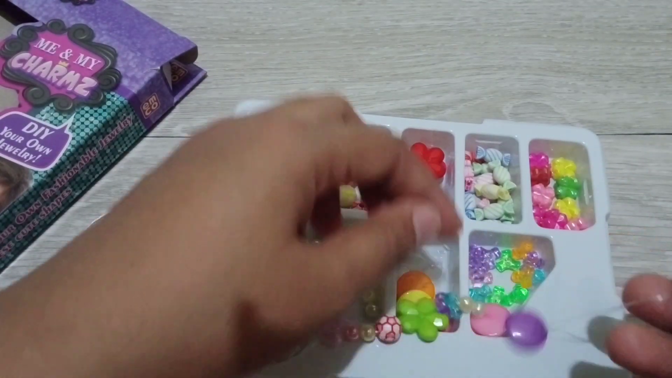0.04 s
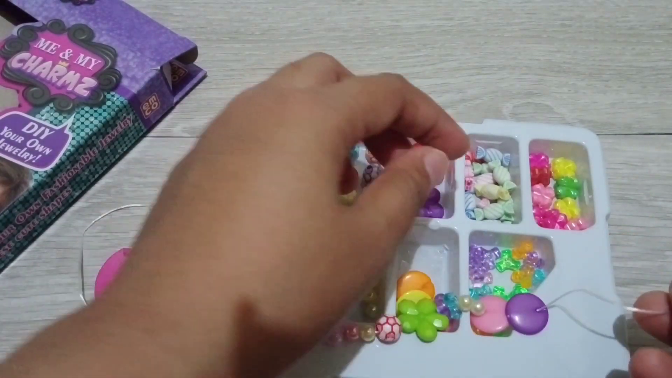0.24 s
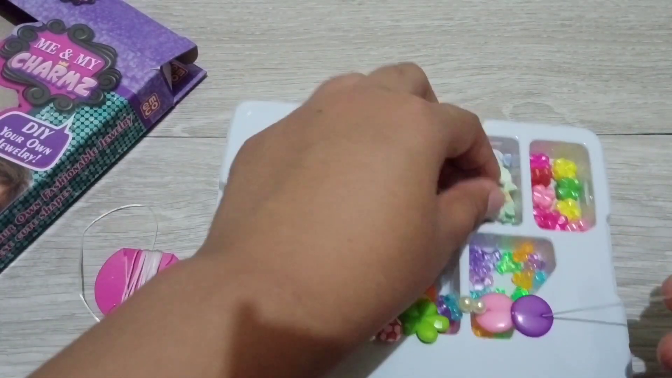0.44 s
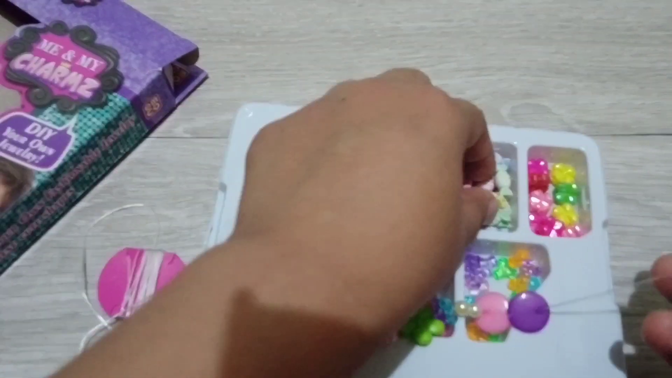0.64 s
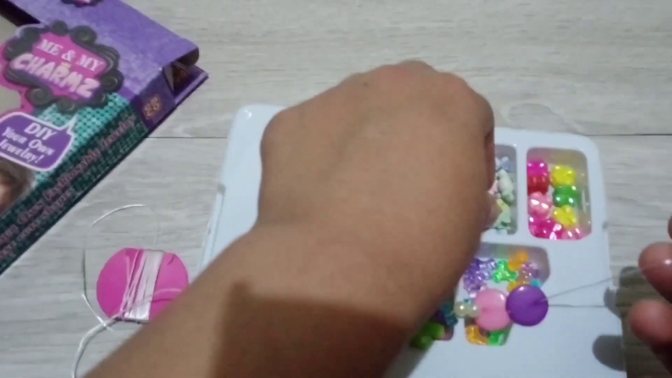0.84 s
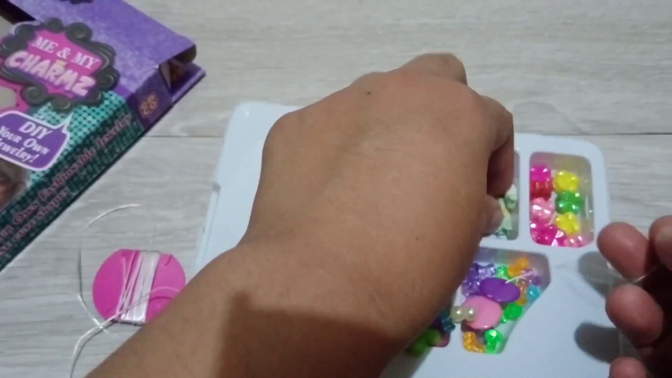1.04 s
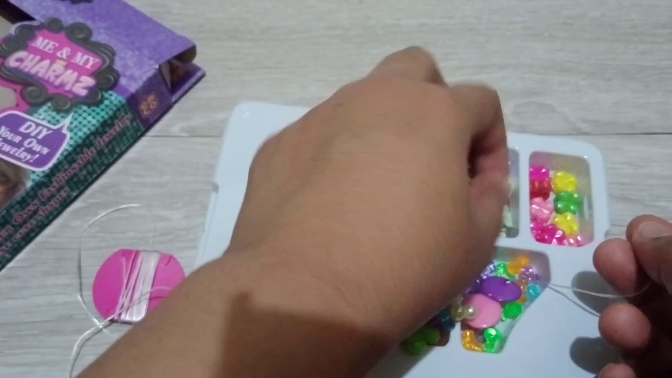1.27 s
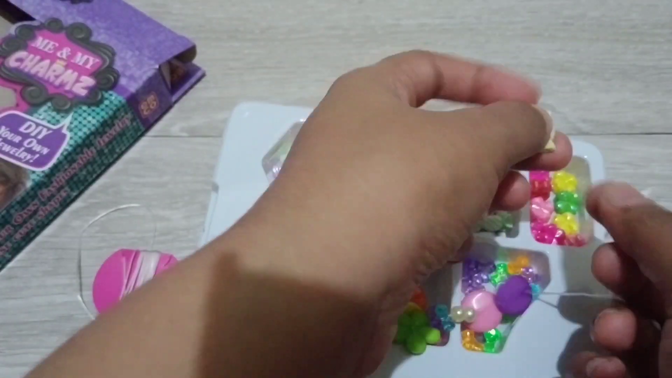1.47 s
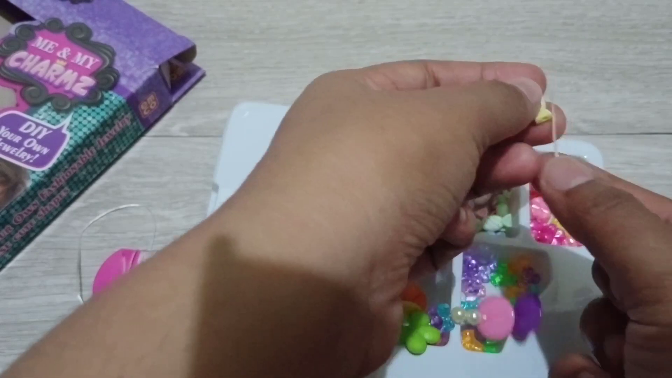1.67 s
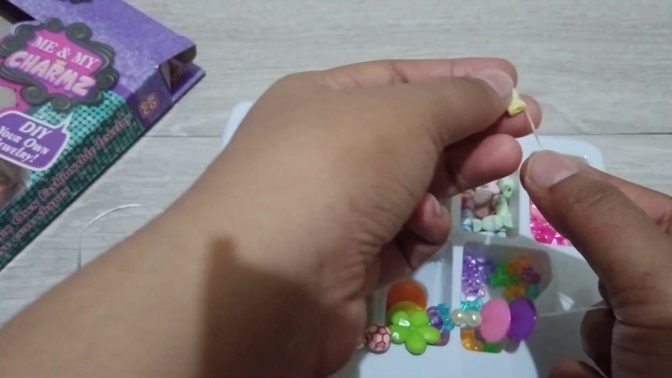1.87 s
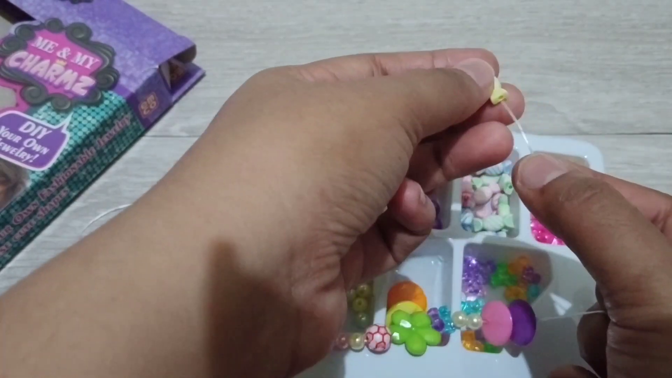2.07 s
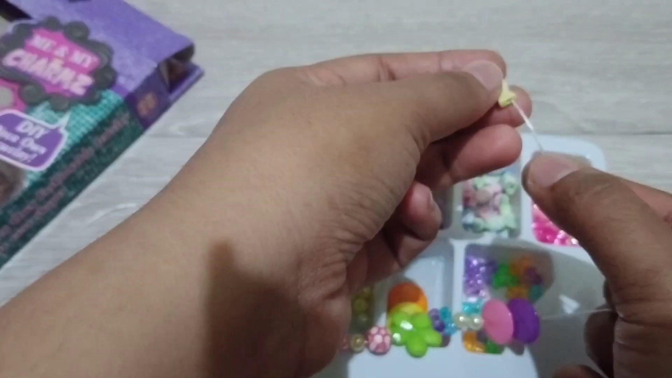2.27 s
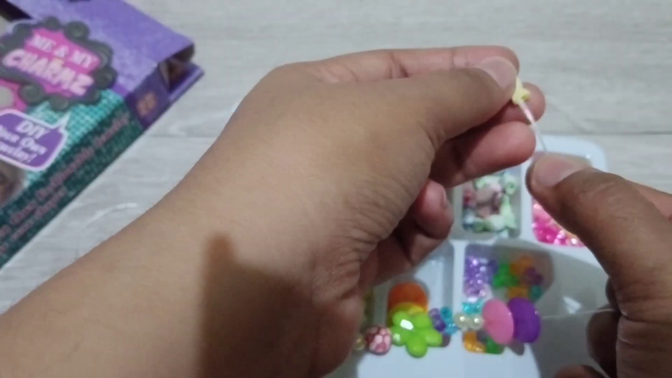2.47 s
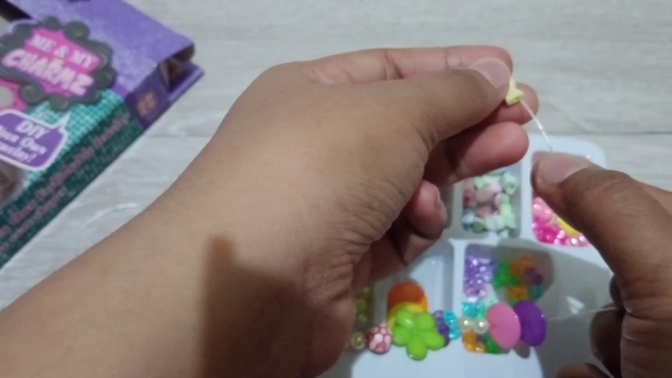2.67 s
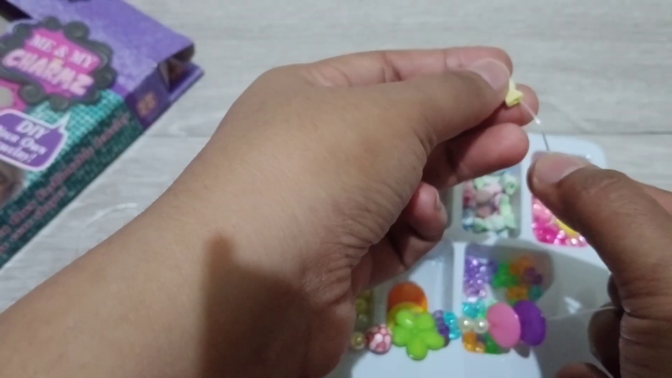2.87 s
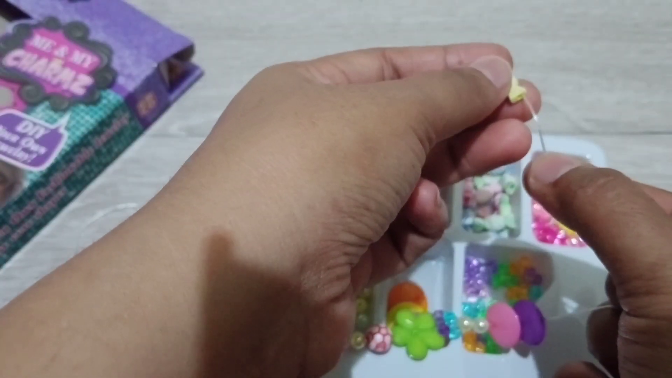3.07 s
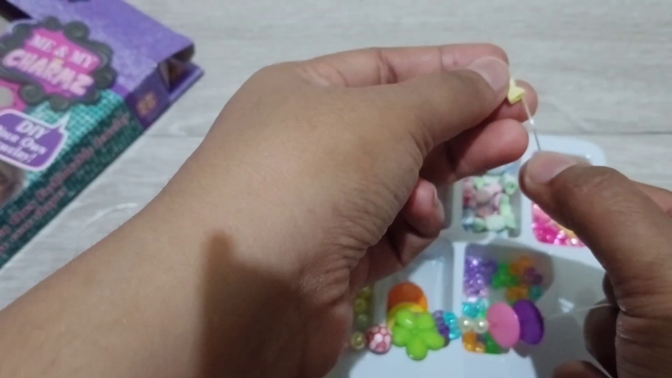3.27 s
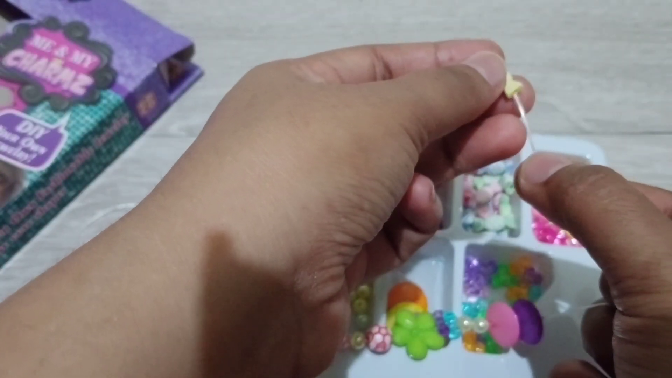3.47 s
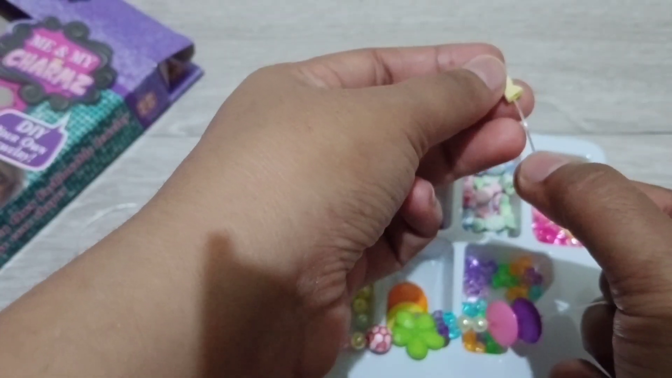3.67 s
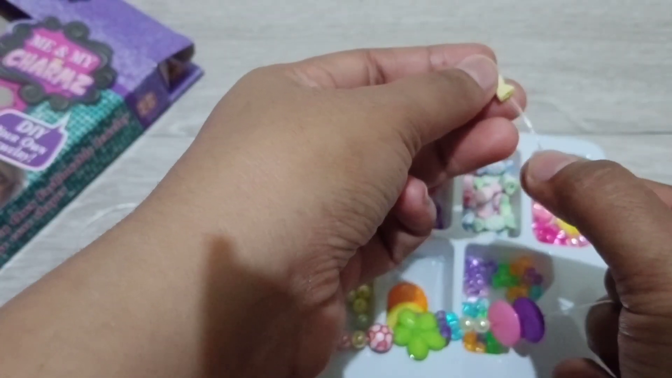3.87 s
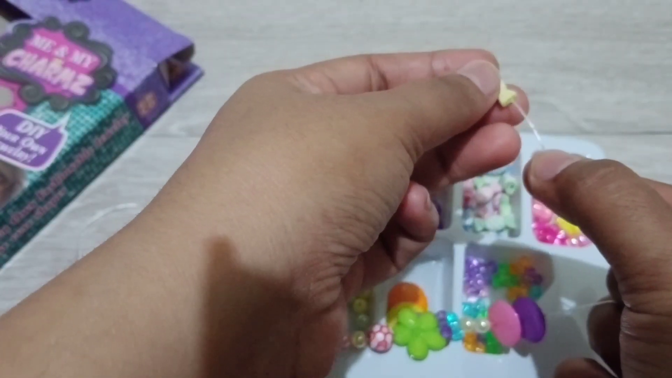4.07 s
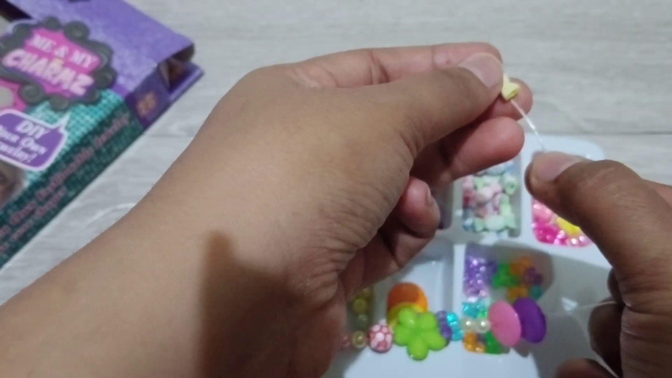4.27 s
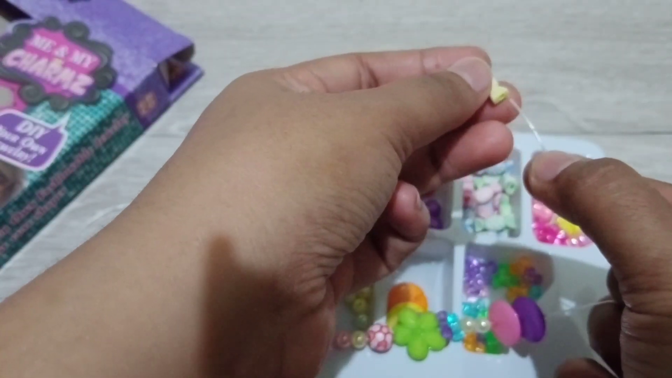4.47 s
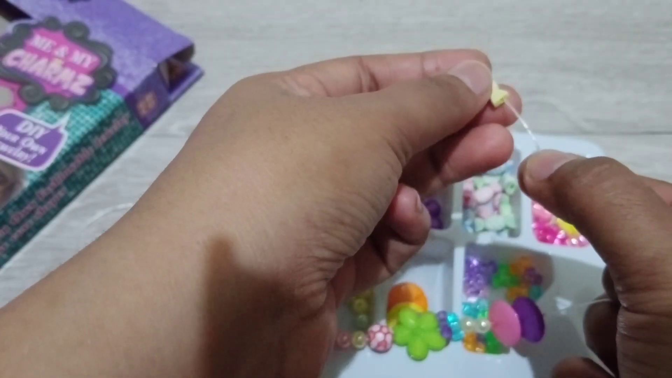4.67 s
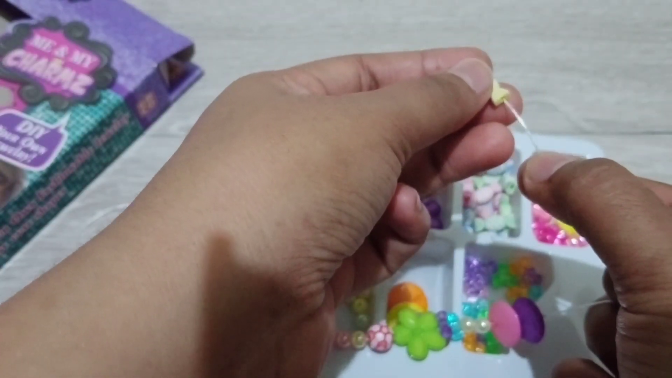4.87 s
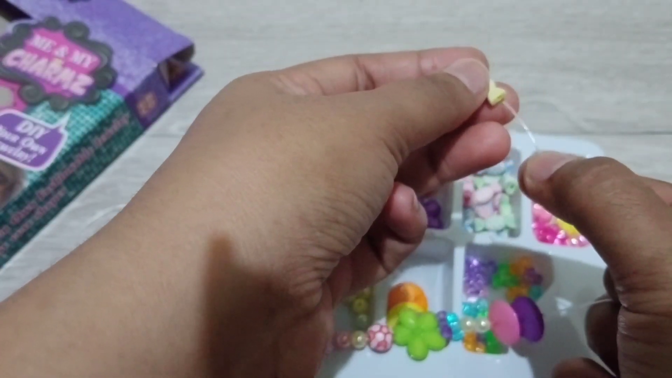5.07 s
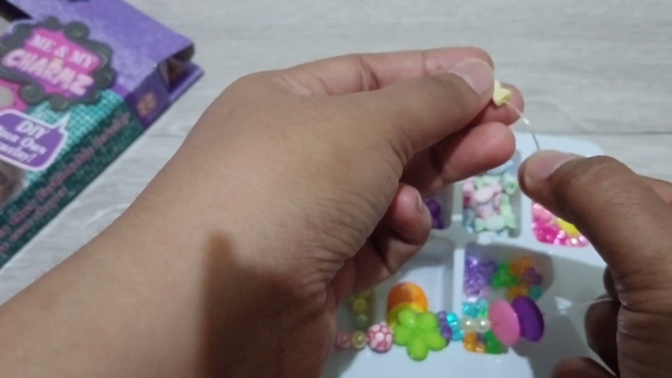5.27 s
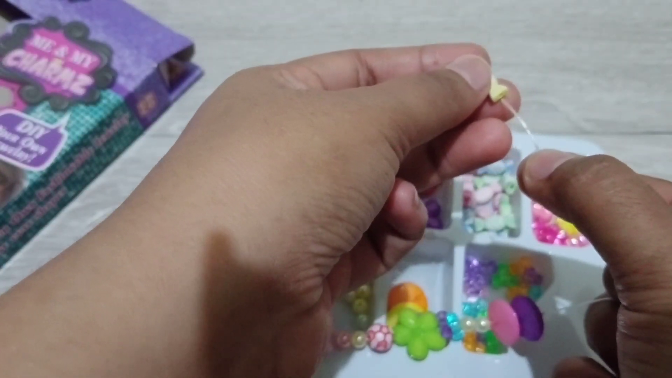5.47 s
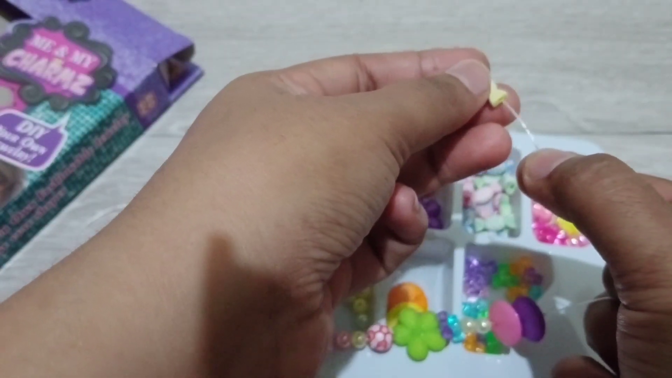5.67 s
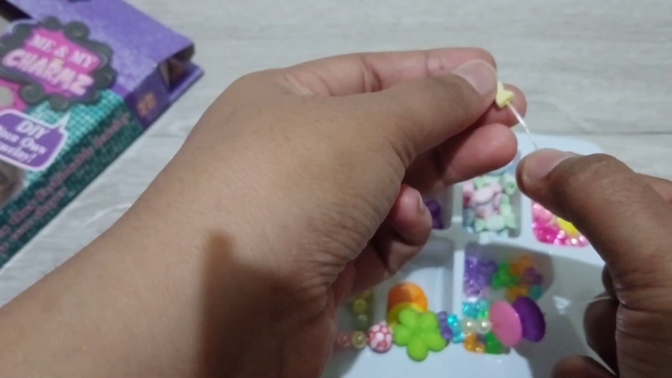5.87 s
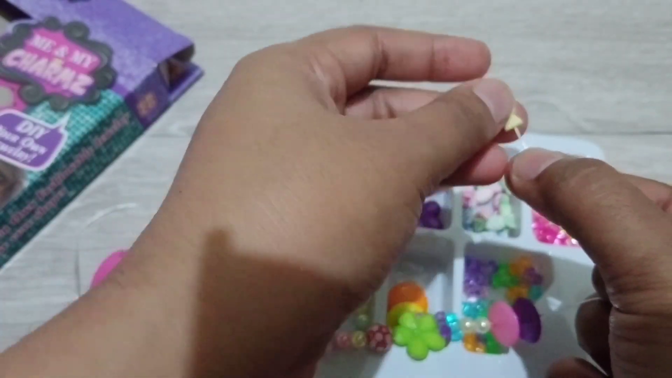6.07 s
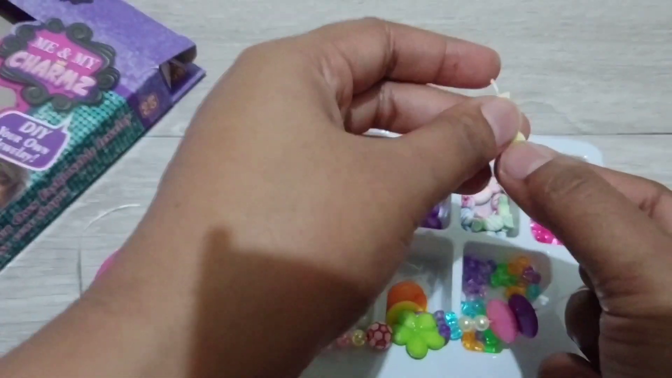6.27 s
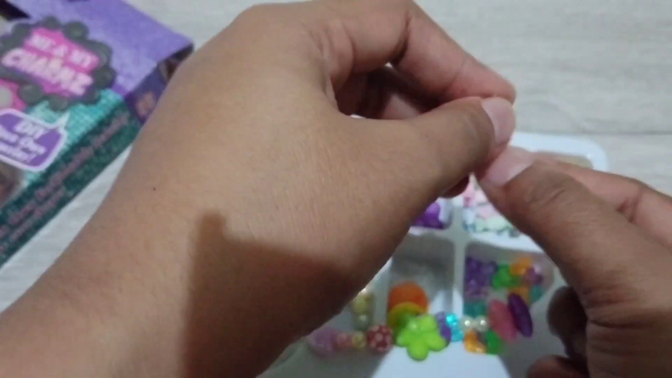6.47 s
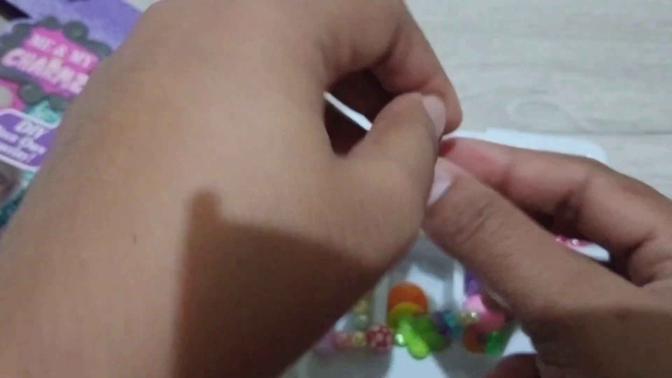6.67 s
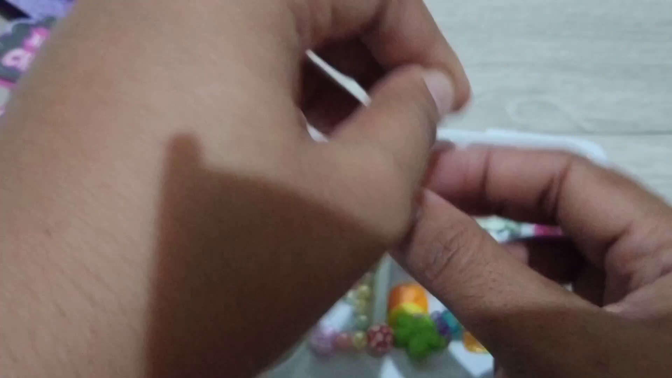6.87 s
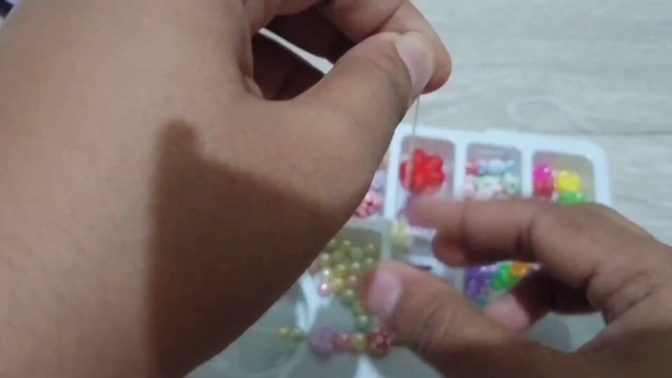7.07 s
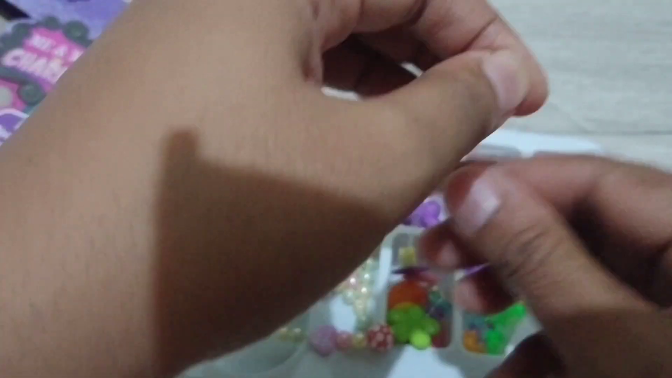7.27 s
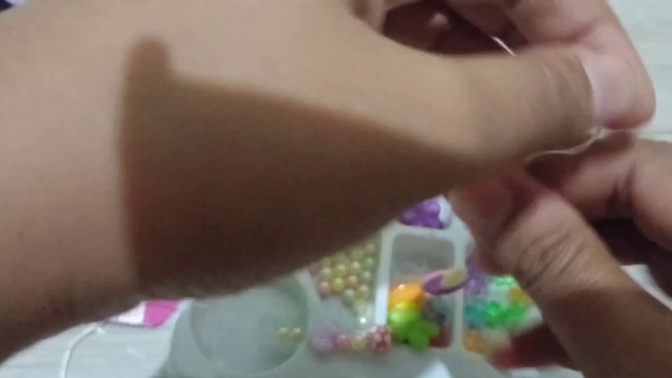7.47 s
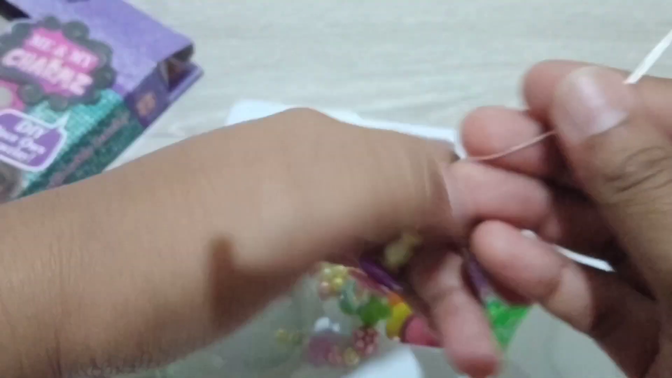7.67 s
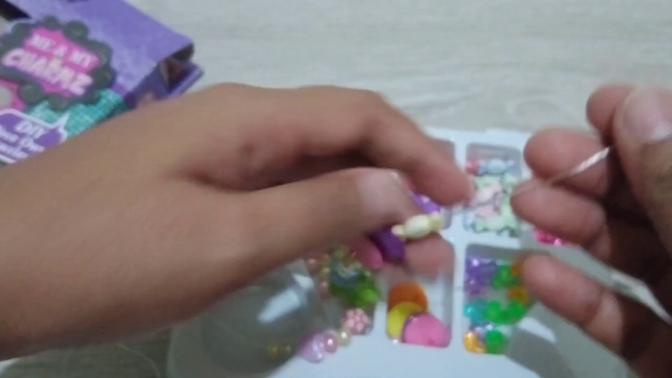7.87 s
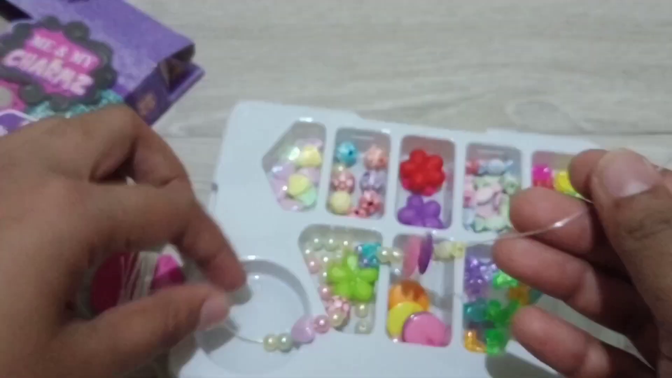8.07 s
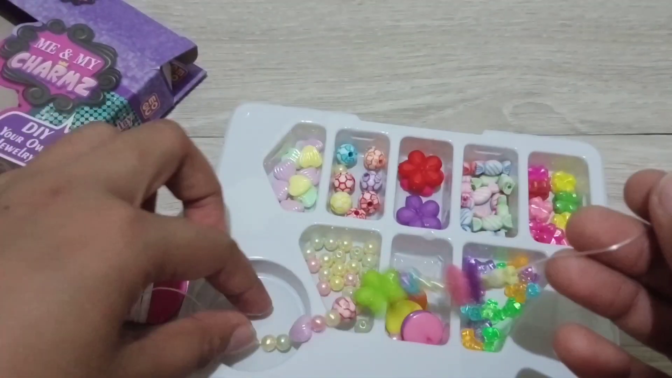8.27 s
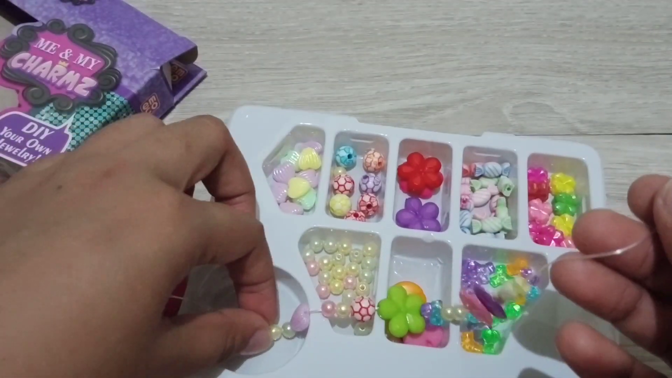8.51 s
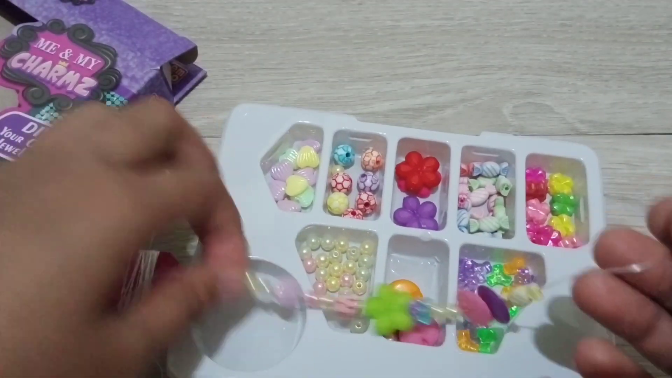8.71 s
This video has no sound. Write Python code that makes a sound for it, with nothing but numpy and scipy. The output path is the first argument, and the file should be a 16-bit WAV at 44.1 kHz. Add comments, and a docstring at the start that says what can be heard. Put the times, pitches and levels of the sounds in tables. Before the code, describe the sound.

A fan hums throughout in a small room while someone picks through plastic beads near a phone microphone. The beads rattle and tap in a thin tray, which rings briefly, and one sharp click stands out. For about four seconds there is little but the fan and a very faint pulsing hiss. Then the clicking and jostling return, mixed with small squeaks of fingers and cord.

```python
"""Plastic beads picked and threaded over a thin moulded tray, close to a phone microphone in a small room.
A fan hums behind throughout. For the first 1.6 s beads click and slide, ringing the tray, and the room
answers; one loud click follows near 2 s. A lull holds little but the fan, a faint pulsing whisper and
the odd soft rustle or rub. The fingers stir near 5.9 s, and from 6.6 s to the end the beads click
and rustle busily again, with small squeaks of skin and cord on plastic."""
import sys
import numpy as np
from scipy import signal
from scipy.fft import rfft, irfft, next_fast_len
from scipy.io import wavfile
from scipy.ndimage import map_coordinates

SR = 44100
rng = np.random.default_rng(int(sys.argv[2]) if len(sys.argv) > 2 else 0)


def transcribe(signal):
    """Save signal, clipped to [-1, 1], as a 16-bit WAV file at the path in sys.argv[1]."""
    frames = np.atleast_2d(signal).T
    limited = np.clip(frames, -1, 1)
    pcm = np.round(limited * 32767).astype(np.int16)
    wavfile.write(sys.argv[1], SR, pcm)


N = 385434

# spectrum of the fan's air noise at the microphone: f/Hz, relative level/dB
FAN_AIR = [(15, -13), (40, -2), (75, -6), (120, -1.5), (210, -5.5), (400, -9.5), (750, -10.5), (900, -15.5),
           (3350, -21), (3750, -23), (4300, -29), (5570, -34.5), (6800, -20.5), (8800, -32), (9850, -36.5),
           (13500, -38.5), (15300, -40), (15800, -47), (15950, -91)]
# decay of the small room: f/Hz, t60/s
ROOM_DECAY = [(400, 0.16), (1500, 0.33), (5000, 0.27), (12000, 0.24)]
# modes of the tray and its beads: f/Hz, width/Hz, relative level/dB
TRAY_MODES = [(232, 47, -29), (302, 54, 8), (376, 110, 8.5), (683, 390, 3.5), (772, 360, 3), (1050, 50, -5),
              (1235, 76, -16), (1334, 86, 8.5), (1436, 130, 3), (1513, 98, 9), (1582, 700, 0.5),
              (1903, 65, 9), (2277, 680, 0.5), (2403, 78, 12.5), (2540, 520, 4), (2826, 160, 14.5),
              (3210, 600, 4.5), (3630, 136, 14.5), (3930, 810, -1.5), (4640, 140, 8), (5940, 1400, -8.5),
              (7000, 130, 14.5), (7970, 930, 8.5), (9220, 200, -2), (10100, 26, 1), (15700, 820, 1)]
# the registers of a contact (knock, clack, tick, sizzle): low f/Hz, high f/Hz, multiple of its t60
REGISTER_BANDS = [(561, 1710, 1.24), (2020, 4600, 1.26), (4560, 9860, 1.05), (9400, 22000, 2.6)]
# skin and cord slipping on plastic: t/s, length/s, first f/Hz, last f/Hz, width/Hz, level/dB
SLIPS = [(0.433, 0.014, 1640, 2060, 300, -55), (3.8, 0.055, 1554, 1550, 500, -70),
         (5.9, 0.053, 1810, 1780, 398, -59), (5.965, 0.038, 8100, 8100, 700, -65.5),
         (6.764, 0.06, 2810, 3760, 1530, -50), (7.008, 0.01, 9600, 9570, 1590, -42),
         (7.939, 0.071, 1370, 1390, 200, -54)]
# beads sliding and jostling: t/s, length/s, level/dB, hollowness/dB, hardness/dB, fade/dB
# hollowness is the low knock over the clack, hardness the tick over the clack
SLIDES = [(0.041, 0.094, -58.5, 2.5, -1.5, 30), (0.445, 0.064, -52.5, 1, -5, 7),
          (.5, 0.091, -69, 5, -7, 14), (0.581, 0.038, -60, 3, -5, 7), (.67, 0.048, -65, -9, -10, 10),
          (0.751, 0.028, -55, 0, -8, 0), (.771, 0.13, -55.5, 1, -7, 23), (0.86, 0.14, -62.5, 2.5, -8, 1),
          (0.96, 0.095, -51, 0.5, -8, -10), (1.04, 0.082, -58, 2, -2.5, -7),
          (1.124, 0.18, -57.5, 3.5, -7, -3), (1.464, 0.096, -67.5, 0, -2, 6), (1.571, .035, -67, 5, 0, 10),
          (1.855, 0.032, -69, 2, -19, 0), (2.528, .025, -70.5, 4, -9, 2), (4.05, .05, -73, 2, -2, 0),
          (5.897, 0.081, -71.5, 7, -5, 24), (5.957, .072, -74.5, 5, 6, 7), (6.651, 0.085, -53, -6, -3, 24),
          (6.752, 0.13, -50.5, -8, -12.5, 19), (6.848, 0.12, -59.5, -3, -5, 20),
          (6.937, .045, -58, -1, -7, 17), (6.968, 0.11, -58.5, 1, -8, -3),
          (7.137, 0.083, -61.5, -3, 0.5, -3), (7.195, 0.15, -71.5, 2.5, 0.5, 6),
          (7.474, 0.17, -70, 3.5, -0.5, 11), (7.617, 0.12, -66, -2, 4.5, 11),
          (7.723, 0.14, -70, 2, -3.5, 5), (7.86, 0.12, -69.5, -1, -1, 7), (7.94, 0.041, -48.5, -2, -9, 9),
          (8.002, 0.037, -50.5, -1, 3.5, 18), (8.055, 0.049, -68.5, 1, -6, 7),
          (8.099, 0.13, -64.5, 2.5, -5, -8), (8.203, 0.089, -70.5, 6.5, 0, 3),
          (8.262, 0.096, -63, 5.5, -6, -1), (8.296, 0.016, -51.5, 7, 0, -3),
          (8.316, 0.056, -57.5, 1.5, -2, 10), (8.495, 0.054, -66, 0, -8, 7), (8.571, .06, -65.5, 7, -8, -9),
          (8.627, 0.044, -54, -9, -5, 20), (8.718, 0.0088, -45, 6.5, -1, -10)]
# single contacts: t/s, level/dB, hollowness/dB, hardness/dB, knock f/Hz, clack f/Hz, t60/s
# the two pitches tell which modes the struck spot favours
CONTACTS = [(.0179, -56.5, 8, -3, 660, 2220, 0.055), (.0433, -30.5, -7, -12.5, 1170, 3520, 0.023),
            (0.073, -39, -2, -9.5, 1460, 2510, 0.017), (0.4649, -37.5, -2.5, -19.5, 1300, 2240, 0.02),
            (.481, -46, -2, -11, 1190, 3110, 0.025), (0.591, -59, -7, -9, 1640, 1910, 0.081),
            (0.6179, -39, 0, -14.5, 1500, 3150, 0.031), (0.6247, -35.5, -0.5, -7, 1590, 2410, 0.027),
            (0.667, -62, 16, -1, 1714, 1930, 0.024), (0.6935, -48, -4, -19, 1380, 3330, 0.028),
            (0.7666, -27.5, -8, 1.5, 1420, 3700, 0.027), (0.7843, -30, -4.5, -0.5, 870, 2360, 0.02),
            (.815, -39, 2.5, -2.5, 790, 3340, 0.014), (0.886, -43, 1, 1.5, 810, 2400, 0.015),
            (0.9266, -40.5, -14, -10.5, 1590, 2430, .019), (0.945, -47, -16, -6, 1530, 2210, 0.036),
            (0.976, -48.5, -5, -2.5, 780, 2290, 0.066), (0.995, -41.5, -3, 0, 1030, 2190, 0.061),
            (1.0143, -29, -11, -10, 810, 2620, 0.018), (1.0199, -41, -3, -3.5, 1600, 3140, 0.053),
            (1.0644, -47.5, -3, -16, 1410, 3150, .039), (1.092, -43.5, -2.5, -13.5, 830, 3180, .02),
            (1.173, -42, -5.5, -17, 1630, 3400, 0.019), (1.2177, -53.5, 3, -13, 898, 2420, 0.045),
            (1.232, -43.5, -3, -11, 980, 2550, 0.028), (1.26, -45.5, -6, -12, 1570, 2530, 0.057),
            (1.298, -41, -6.5, -2, 1090, 2440, 0.03), (1.412, -45.5, 4, -5, 1660, 1850, 0.017),
            (1.476, -48.5, -2, -21.5, 1480, 2550, 0.014), (1.4923, -52.5, -1, -12, 1560, 2230, 0.049),
            (1.4984, -47.5, 6.5, -6, 1550, 2400, 0.0098), (1.533, -39, -2, -2.5, 1630, 2420, 0.022),
            (1.5666, -48.5, -2.5, -19, 1580, 2290, 0.051), (1.9513, -23.5, -1.5, -2, 820, 2020, 0.016),
            (6.026, -51.5, -2.5, -10.5, 1670, 2610, 0.035), (6.591, -48, 1, -10.5, 1520, 2640, 0.02),
            (6.6372, -47, -3, -4.5, 1450, 3400, 0.036), (6.656, -35, -1, -10.5, 1390, 2510, 0.02),
            (6.6668, -37, 3.5, 3, 1540, 2170, .058), (6.6713, -26.5, -11, -4, 1500, 2450, 0.032),
            (6.7269, -38, -8, -10, 1350, 2040, 0.017), (6.813, -49, -0.5, -2, 1400, 3550, 0.083),
            (6.823, -45.5, 1, -1.5, 810, 3230, 0.042), (6.8642, -45, 2, -6.5, 1510, 3570, 0.042),
            (6.8916, -36, -3.5, -11.5, 1470, 1980, 0.023), (6.9416, -33.5, -2, -6, 1500, 2050, 0.0099),
            (6.9825, -47.5, -3, 9.5, 1320, 2310, 0.023), (6.99, -38, 2.5, 0, 800, 3900, 0.022),
            (7.0071, -41.5, -5, -14.5, 1450, 4040, 0.047), (7.012, -57, -5, 7, 1490, 2060, 0.018),
            (7.1546, -56, 5, -2.5, 1340, 1850, 0.023), (7.1985, -48, 0.5, 7.5, 1560, 2340, 0.011),
            (7.2144, -49.5, 0.5, -12, 1500, 2050, 0.028), (7.3089, -56, 2.5, -11, 710, 2190, 0.026),
            (7.3829, -40, -3, -8, 887, 1990, .025), (7.532, -59, 12, 4, 1370, 2110, 0.019),
            (7.6714, -55, 3, 3.5, 1430, 2970, .037), (7.683, -58, 3, 5.5, 810, 2190, 0.024),
            (7.833, -53, -2, -1, 1210, 2550, 0.048), (7.895, -72, -6, 14, 1220, 2610, 0.029),
            (7.934, -37, -2, -4, 1340, 2120, 0.055), (7.942, -48, 9, 8.5, 1290, 1900, 0.044),
            (7.954, -49, -2, -2.5, 1460, 2090, 0.22), (7.978, -39.5, -3, -12, 1310, 1850, 0.012),
            (7.992, -39, 0, -6, 1530, 2400, 0.045), (8.005, -30, -5, -5.5, 1390, 2390, 0.037),
            (8.055, -52, -3, -9, 1700, 2440, 0.047), (8.125, -44.5, 1, -12, 1470, 1860, 0.03),
            (8.153, -54, -6, -4, 1540, 2450, 0.099), (8.237, -54, -7, -14, 1030, 2260, .036),
            (8.2772, -58, 16, -14, 1480, 1990, .008), (8.309, -27, -1.5, -4.5, 1360, 2220, 0.027),
            (8.3479, -41, 4, -7.5, 1370, 2190, 0.029), (8.358, -41.5, -5, -10.5, 1690, 2110, 0.03),
            (8.4983, -52.5, 1, -10.5, 1240, 2360, 0.027), (8.581, -51, -3, -3, 1670, 2380, .025),
            (8.6194, -54.5, 0, -9, 1400, 2480, 0.11), (8.6358, -30, -8.5, -3.5, 733, 2460, 0.01),
            (8.7242, -34, -10, -9.5, 1410, 2440, 0.04)]
# the whole tray thumps more while fingers press into it: t/s, thump level over the knock/dB
FINGER_PRESS = [(0, -11), (.45, -14.5), (1.25, 0), (1.35, -35), (7.1, -33), (7.3, -7), (7.5, -8),
                (7.93, -3), (7.97, -30), (8.2, -15.5), (8.64, -9), (8.72, -26)]
# colour of the phone microphone: f/Hz, gain/dB
MIC_COLOUR = [(20, -13.5), (90, 1.5), (13500, -1.5), (15300, 4.5), (15800, 10), (16500, -25)]

AIR_DB, BLADE_DB, OCTAVE_DB, WHINE_DB = -62.5, -70.5, -63.5, -90
BLADE_HZ, WHINE_HZ = 245.6, 3760
WHISPER_FIRST_S, WHISPER_EVERY_S, WHISPER_S = 0.575, 0.59, 0.064
WHISPER_HZ, WHISPER_WIDTH_HZ, WHISPER_DB = 3740, 300, -80
MIDDLE_DB, RISE_S = -40, 0.0006  # level and rise of a middling contact
ROOM_DB, MIC_TOP_HZ = -15.5, 16800


def amp(db):
    """Gain of a level in dB."""
    return 10 ** (np.asarray(db) / 20)


def unit(x):
    """x at rms 1."""
    return x / np.sqrt(np.mean(x ** 2) + 1e-20)


def decay(t, t60):
    """An envelope that falls 60 dB in t60 seconds."""
    return amp(-60 * t / t60)


def along(points, hz):
    """(f/Hz, value) points interpolated on a log axis."""
    f, v = np.transpose(points)
    return np.interp(np.log(hz + 1), np.log(f + 1), v)


def wobble(rate):
    """A smooth random curve, rate knots a second."""
    return map_coordinates(rng.standard_normal(int(N * rate / SR) + 4), [np.arange(N) * rate / SR])


def filtered(x, response):
    """x times a complex response of frequency."""
    m = next_fast_len(N + SR // 2)
    return irfft(rfft(x, m) * response(np.fft.rfftfreq(m, 1 / SR)), m)[..., :N]


def whisper():
    """Faint in the background, a high narrow noise swells softly at an even pace."""
    t = np.arange(N) / SR
    from_peak = (t - WHISPER_FIRST_S + WHISPER_EVERY_S / 2) % WHISPER_EVERY_S - WHISPER_EVERY_S / 2
    swell = np.exp(-(2 * from_peak / WHISPER_S) ** 2) * amp(WHISPER_DB + 1.2 * wobble(1.8))
    band = lambda hz: np.exp(-((hz - WHISPER_HZ) / WHISPER_WIDTH_HZ) ** 2)
    return swell * unit(filtered(rng.standard_normal(N), band))


def fan():
    """The fan behind the tray: air noise, a wavering blade tone, its steadier octave and a thin whine."""
    air_gain = amp(AIR_DB + 0.49 * wobble(2.74))
    air = air_gain * unit(filtered(rng.standard_normal(N), lambda hz: amp(along(FAN_AIR, hz))))
    phase = 2 * np.pi * np.cumsum(BLADE_HZ + 0.42 * wobble(6.8)) / SR
    blade = wobble(16) * np.sin(phase) + wobble(16) * np.cos(phase)  # comes and goes at random
    whine_gain = amp(WHINE_DB + 3.3 * wobble(4))
    whine = whine_gain * np.sin(2 * np.pi * WHINE_HZ * np.arange(N) / SR + wobble(12))
    blade_gain = amp(BLADE_DB + 2 * wobble(6))
    octave = amp(OCTAVE_DB + 1.13 * wobble(6)) * np.sin(2 * phase)
    return air + blade_gain * blade + whine + octave


def room(x):
    """The small room's diffuse answer, new as the hands move; each frequency dies at its own speed."""
    out, step = np.zeros(N + 2 * SR), SR // 4
    wall_delay = round(0.008 * SR)
    for at in range(0, N, step):
        hz, t, noise = signal.stft(rng.standard_normal(SR // 3), SR, nperseg=256)
        near = 1 + 0.37 * decay(t, 0.12)  # the floor and the hands answer first and briefly
        tail = signal.istft(noise * near * decay(t, along(ROOM_DECAY, hz)[:, None]), SR, nperseg=256)[1]
        answer = signal.fftconvolve(x[at:at + step], tail / np.linalg.norm(tail))
        out[at + wall_delay:][:len(answer)] += answer
    return out[:N]


def squeaks():
    """Skin and cord stick and slip on plastic: gliding tones that jitter in strength and phase."""
    out = np.zeros(N)
    for start, length, first_hz, last_hz, width_hz, db in SLIPS:
        u = np.linspace(0, 1, round(length * SR))
        knots = rng.standard_normal((2, 100))
        jitter = [map_coordinates(row, [u * length * width_hz]) for row in knots]
        phase = 2 * np.pi * np.cumsum(first_hz + (last_hz - first_hz) * u) / SR
        rub = jitter[0] * np.sin(phase) + jitter[1] * np.cos(phase)
        out[round(start * SR):][:len(u)] += amp(db) * np.sin(np.pi * u) ** 0.68 * rub
    return out


def tray_response(f):
    """The thin tray's resonances split into the four registers, each with unit power gain."""
    modes = sum((-1) ** k * amp(db) * 1j * f * width / (hz * hz - f * f + 1j * f * width)
                for k, (hz, width, db) in enumerate(TRAY_MODES))
    bands = [signal.butter(3, [lo, hi], "band", fs=SR, output="sos") for lo, hi, _ in REGISTER_BANDS]
    response = np.array([signal.sosfreqz(band, f, fs=SR)[1] for band in bands]) * (modes + amp(-1))
    return response / np.sqrt(np.mean(np.abs(response) ** 2, axis=1, keepdims=True))


def tray_ring(t, centre_hz, spread):
    """The tray's modes near one pitch, struck together at random strengths; rms near 1."""
    hz, _, db = np.transpose(TRAY_MODES)
    strength = amp(db + 5 * rng.standard_normal(len(hz)))
    weight = strength * np.exp(-(np.log(hz / centre_hz) / spread) ** 2)
    return np.sqrt(2) * weight @ np.sin(2 * np.pi * hz[:, None] * t) / np.linalg.norm(weight)


def register_levels(level_db, hollow_db, hard_db):
    """Knock, clack, tick and sizzle in dB; hard, light contacts have the largest share of sizzle."""
    tick_db = level_db + hard_db
    sizzle_db = tick_db - 16 + 0.79 * hard_db - 0.22 * (level_db - MIDDLE_DB)
    return np.array([level_db + hollow_db, level_db, tick_db, sizzle_db])


def rustles():
    """Sliding beads drive the tray's four registers with tiny contacts in quick, uneven clumps."""
    taps = (rng.random(N) < 110 / SR) * rng.exponential(1, N)  # single beads touching within the slide
    taps = np.convolve(taps, decay(np.arange(SR // 50) / SR, 0.013))[:N]
    noise = rng.standard_normal(N)
    clumps = amp(2.6 * wobble(900) + 1.4 * wobble(60))
    grit = unit(noise * (0.5 * clumps + 0.8 * taps))
    force = np.zeros((4, N))
    for start, length, level_db, hollow_db, hard_db, fade_db in SLIDES:
        u = np.linspace(0, 1, round(length * SR))
        shape = np.minimum(1, np.minimum(u / 0.21, (1 - u) / 0.35)) * amp(fade_db * (0.5 - u))
        part = force[:, round(start * SR):][:, :len(u)]
        part += amp(register_levels(level_db, hollow_db, hard_db))[:, None] * shape[:part.shape[1]]
    return force * grit


def clicks():
    """Beads strike close to the microphone: a chattering force per register, and the modes they ring."""
    force, tone = np.zeros((4, N + SR)), np.zeros(N + SR)
    t = np.arange(SR // 10) / SR
    for start, level_db, hollow_db, hard_db, knock_hz, clack_hz, t60 in CONTACTS:
        at = round(start * SR)
        knock_db, clack_db, tick_db, sizzle_db = register_levels(level_db, hollow_db, hard_db)
        thump_db = knock_db + np.interp(start, *np.transpose(FINGER_PRESS))
        rise = RISE_S * amp(-0.2 * (level_db - MIDDLE_DB) - 0.4 * hard_db)  # quicker when loud or hard
        swell = 1 - np.exp(-t / max(0.78 * rise, 1e-4))
        chatter = swell * rng.standard_normal(len(t))
        chatter[round(rise * SR)] -= 7  # the hardest instant of the blow
        snap = 2.8 * decay(t, 0.0019)
        chatter_db = (knock_db - 4, clack_db - 4, tick_db, sizzle_db)
        for row, db, (_, _, stretch) in zip(force, chatter_db, REGISTER_BANDS):
            row[at:][:len(t)] += amp(db) * chatter * (decay(t, stretch * t60) + snap)
        thump = amp(thump_db) * decay(t, 0.016) * tray_ring(t, 250, spread=0.94)
        knock = amp(knock_db - 1) * decay(t, 1.57 * t60) * tray_ring(t, knock_hz, spread=0.062)
        clack = amp(clack_db + 3.5) * decay(t, 0.47 * t60) * tray_ring(t, clack_hz, spread=0.066)
        tone[at:][:len(t)] += swell * (thump + knock + clack)
    return force[:, :N], tone[:N]


def scene():
    """Beads and tray up close, the small room around them, the fan behind; mono."""
    click_force, click_tone = clicks()
    beads = click_tone + squeaks() + filtered(click_force + rustles(), tray_response).sum(axis=0)
    return (beads + amp(ROOM_DB) * room(beads) + fan() + whisper())[None]


def record(dry):
    """The phone microphone colours both ends of the band and keeps nothing above its limit."""
    return filtered(dry, lambda hz: amp(along(MIC_COLOUR, hz)) * (hz < MIC_TOP_HZ))


dry = scene()
out = record(dry)
transcribe(out)
```